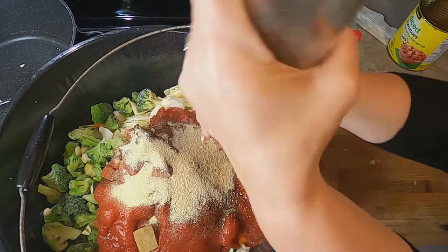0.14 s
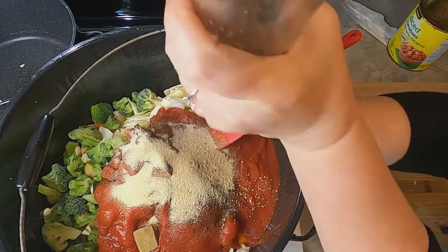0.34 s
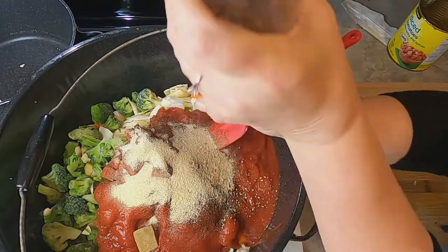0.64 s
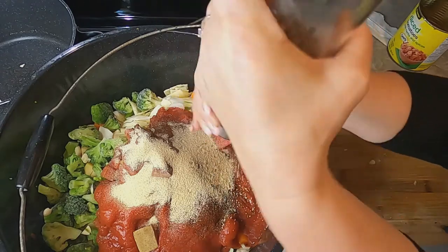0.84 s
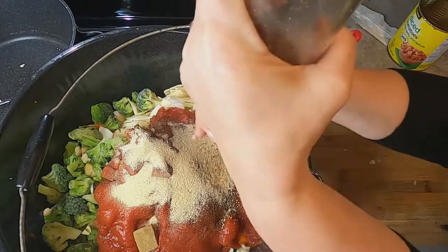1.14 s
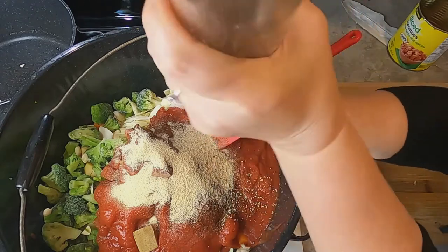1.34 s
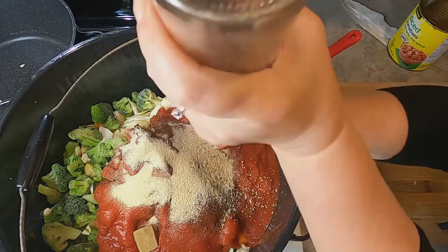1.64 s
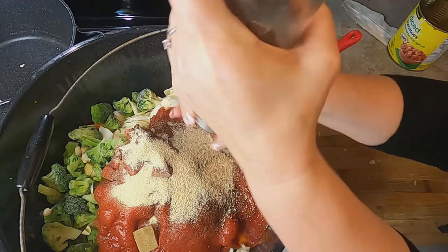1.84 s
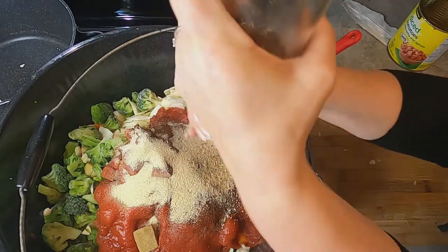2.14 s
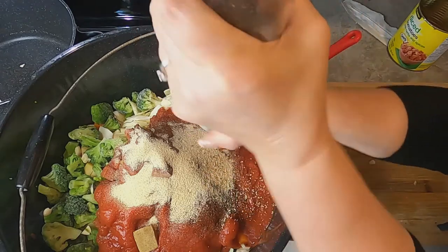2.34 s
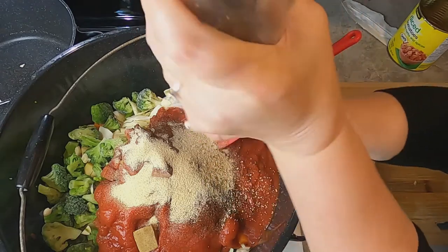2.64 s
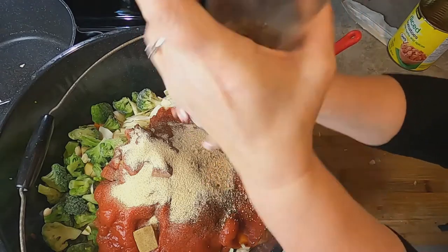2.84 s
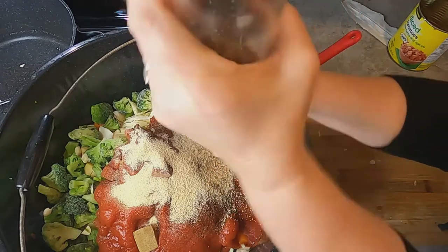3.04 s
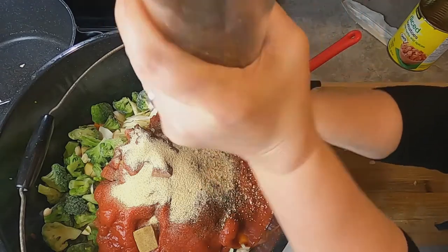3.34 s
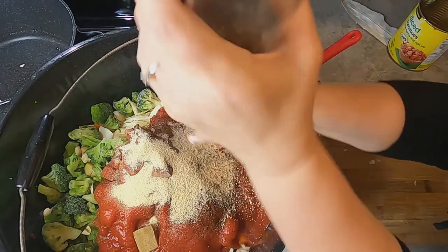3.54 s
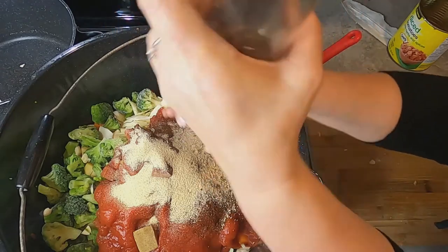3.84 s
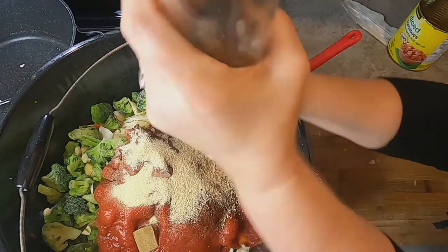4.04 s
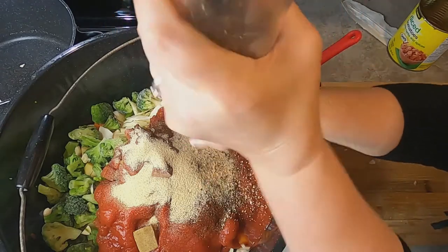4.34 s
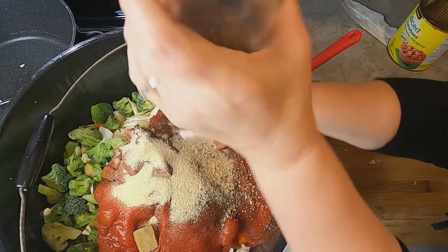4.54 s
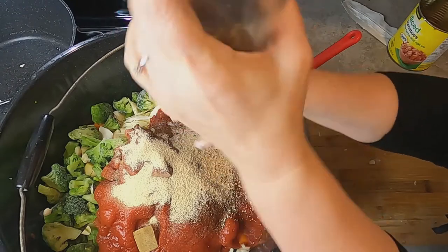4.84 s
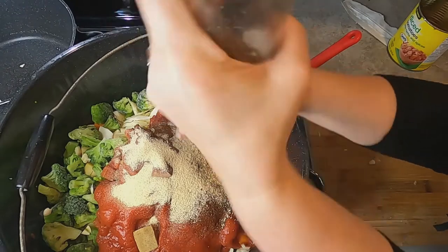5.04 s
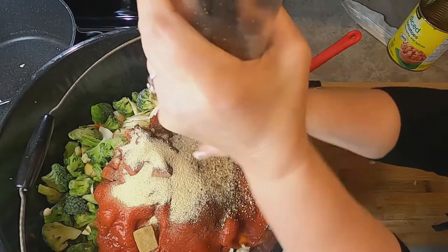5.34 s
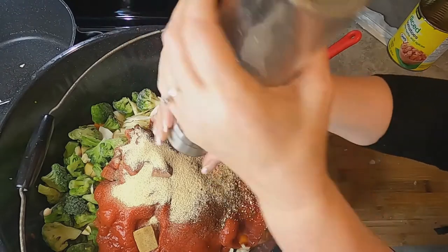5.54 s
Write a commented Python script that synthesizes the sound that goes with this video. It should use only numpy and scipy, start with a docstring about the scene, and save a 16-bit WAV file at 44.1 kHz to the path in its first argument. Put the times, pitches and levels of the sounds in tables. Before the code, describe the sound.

Peppercorns crack and crunch in a hand mill twisted quickly to and fro, with soft rubbing between strokes over faint kitchen rumble.

```python
"""A hand pepper mill twists to and fro, three strokes a second, over a pan in a faintly rumbling kitchen.
Each forward twist starts with a creak as the housing takes the load. The burrs bite: peppercorns
crack and crumble to grit, and every fracture rings the housing. On the swing back the mill
rubs softly and loose pieces tick, until the next twist bites."""
import sys
import numpy as np
from scipy import signal
from scipy.fft import rfft, irfft, next_fast_len
from scipy.io import wavfile
from scipy.ndimage import uniform_filter1d, map_coordinates

SR = 44100
rng = np.random.default_rng(int(sys.argv[2]) if len(sys.argv) > 2 else 0)


def generate_wav(sig):
    """Save sig (samples, or channels by samples) to the path in sys.argv[1] as 16-bit PCM at SR."""
    pcm = np.round(np.clip(np.atleast_2d(sig).T, -1, 1) * 32767).astype(np.int16)
    wavfile.write(sys.argv[1], SR, pcm)


N = 251017
TIME = np.arange(N) / SR
ENVELOPE_TIME = TIME[::32]
LEFT_RIGHT = np.array([[1], [-1]])


def from_db(db):
    """Decibels to gain."""
    return 10 ** (np.asarray(db) / 20)


def unit_rms(x):
    """Scale to unit rms."""
    return x / np.sqrt(np.mean(x ** 2) + 1e-20)


def at_hz(points, hz):
    """Interpolate a curve on a log-frequency axis."""
    points = np.array(points)
    return np.interp(np.log(hz + 1e-9), np.log(points[:, 0]), points[:, 1])


def butter(x, hz, kind, order=2):
    """Causal Butterworth filter."""
    return signal.sosfilt(signal.butter(order, hz, kind, fs=SR, output="sos"), x)


def drift(rate_hz):
    """Random wander, unit rms."""
    knots = rng.standard_normal(4000)
    return unit_rms(np.interp(TIME * rate_hz, np.arange(len(knots)), knots))


def plateau(start_s, end_s, rise_s, fall_s):
    """Exponential rise, hold from start to end, exponential fall."""
    t = ENVELOPE_TIME
    return np.exp(-np.maximum(start_s - t, 0) / rise_s - np.maximum(t - end_s, 0) / fall_s)


def impulses(per_s, spread_db):
    """Random clicks; a positive spread makes a few larger, a negative one a few smaller."""
    sizes = from_db(spread_db * np.minimum(rng.exponential(1, N), 4))
    return unit_rms(sizes * (rng.random(N) < per_s / SR))


def resonate(clicks, modes, apart_hz=12000):
    """Each click drives each mode with a random strength; higher modes differ more left to right."""
    out, drive = np.zeros((2, len(clicks))), np.full((2, len(clicks)), 1e-18)
    hits = np.flatnonzero(clicks)
    pool = min(len(clicks), 4099)
    for hz, width_hz, level_db, pan_db in modes:
        radius, angle = np.exp(-np.pi * width_hz / SR), 2 * np.pi * hz / SR
        mid, side = rng.standard_normal((2, pool))[:, hits % pool]
        apart = min(hz / apart_hz, 1)
        gain = from_db(level_db + pan_db * LEFT_RIGHT / 2) / np.hypot(1, apart)
        drive[:, hits] = gain * clicks[hits] * (mid + apart * side * LEFT_RIGHT)
        drive[:, ::64] += 1e-18   # denormal guard
        leak = np.exp(-angle / 2)   # a small body radiates poorly below each mode
        zeros = np.array([1, -1, -1, 1]) * (1 - radius ** 2) * (1 + leak) / 4
        poles = np.convolve([1, -2 * radius * np.cos(angle), radius ** 2], [1, -leak])
        out += signal.lfilter(zeros, poles, drive)
    return out


# Room noise spectrum: f/Hz, relative density/dB
AIR_SPECTRUM = [(20, 10), (42, 6), (65, -5), (100, -22.5), (160, 4), (220, -4), (320, -7.5), (550, -12.5),
                (1200, -12.5), (3000, -10), (7000, -11.5), (14000, -30.5)]


def room_air(level_db=-58.5, side_gain=0.89, heave_db=3.0):
    """Room hiss and a slowly heaving rumble."""
    size = next_fast_len(N)
    shape = from_db(at_hz(AIR_SPECTRUM, np.arange(size // 2 + 1) * SR / size))
    mid, side = irfft(rfft(rng.standard_normal((2, size))) * shape, size)[:, :N]
    side = side_gain * butter(side, 46, "high", order=1)
    noise = from_db(level_db) * unit_rms(mid + side * LEFT_RIGHT)
    rumble = butter(noise, 60, "low", order=1)
    return noise + rumble * (from_db(heave_db * drift(6.3)) - 1)


# Wall reverberation: f/Hz, T60/s
WALL_DECAY = [(200, 0.33), (1000, 0.38), (4000, 0.46), (14000, 0.26)]


def kitchen_echoes(x, tail_db=-12.0, near_db=-12.5, near_s=0.0035, side_gain=0.74, wide_hz=1110):
    """Quick reflections off hands, pan and hob, then the walls' short tail; narrow in the bass."""
    t = np.arange(SR // 2) / SR
    edges_hz = np.geomspace(100, 16000, 8)
    mid, side = rng.standard_normal((2, len(t)))
    side = side_gain * butter(side, wide_hz, "high", order=1)
    noise = (mid + side * LEFT_RIGHT) * (t > 0.002)
    tail = 0
    for low, high in zip(edges_hz, edges_hz[1:]):
        t60_s = at_hz(WALL_DECAY, np.sqrt(low * high))
        tail += butter(noise, [low, high], "band") * from_db(-60 * t / t60_s)
    near = noise * np.exp(-t / near_s)
    response = from_db(tail_db) * unit_rms(tail) + from_db(near_db) * unit_rms(near)
    return signal.fftconvolve(x, response / np.sqrt(len(t)), axes=1)[:, :N]


# Rubbing modes: f/Hz, width/Hz, level/dB, left-right/dB
WHISPER_MODES = [(1157, 70, -18, 2), (1760, 600, -14.5, 3), (2400, 130, -10, 3), (2646, 167, -2.5, 2),
                 (3120, 270, -18.5, 5), (5230, 400, -13.5, 0), (5860, 320, -6, 1.5), (7500, 170, -25, 20),
                 (9540, 120, -14.5, -3), (12080, 420, -28.5, -16.5)]
# Thin ring of the sliding burr: f/Hz, width/Hz, level/dB, left-right/dB
BURR_MODES = [(2694, 80, 0, 2.5)]


def rubbing(gain_db=-4.5, floor_db=-68, ring_db=-5, grip_db=4.0, flutter_db=3.0, waver=0.021):
    """Fine stick-slip on the swing back: a whisper and a thin ring, wavering with the grip."""
    ring_gain = from_db(ring_db + grip_db * np.tanh(drift(21)))
    ring = ring_gain * unit_rms(resonate(impulses(per_s=1800, spread_db=4.5), BURR_MODES))
    whisper = unit_rms(resonate(impulses(per_s=1800, spread_db=4.5), WHISPER_MODES))
    position = np.cumsum(1 + waver * drift(16))
    rub = np.array([map_coordinates(channel, [position], mode="mirror") for channel in whisper + ring])
    swings, start_s = 0, 0
    for bite_s, hold_s, *_, swing_db in TWISTS:
        # the hand rests before and after each twist
        swings += from_db(swing_db) * plateau(start_s, bite_s - 0.091, rise_s=0.03, fall_s=0.056)
        start_s = bite_s + hold_s + 0.06
    envelope = np.interp(TIME, ENVELOPE_TIME, swings) + from_db(floor_db)
    return envelope * from_db(gain_db + flutter_db * drift(60)) * rub


# Mill housing modes: f/Hz, width/Hz, level/dB, left-right/dB
HOUSING_MODES = [(225, 64, -25.5, -16), (450, 73, -13.5, 2.5), (584, 37, -9, 3.5), (805, 86, -5, -2.5),
                 (921, 82, -1.5, 6.5), (1047, 103, 3, -2.5), (1192, 68, 2.5, 7.5), (1343, 107, 2, 1),
                 (1544, 77, 1.5, 7.5), (1730, 246, -1.5, -2), (1933, 195, -6, 8), (2192, 20, -0.5, 9.5),
                 (2620, 128, 2, -3.5), (2755, 347, 1.5, 7.5), (3137, 86, 0, -3), (3580, 380, -4, 1.5),
                 (3996, 200, -4, 1.5), (4426, 310, -4.5, 3), (4980, 160, -4, -1), (5416, 520, -7, 0),
                 (6960, 430, -12, -1), (7550, 47, -10.5, 13), (8520, 140, -10, 0), (9220, 590, -15.5, -11),
                 (11900, 490, -46, -12), (13300, 440, -33, -15)]
# Low, mid and treble bands of a snap: lower f/Hz, upper f/Hz
SNAP_BANDS = [(100, 2200), (2200, 3400), (3400, 16000)]


def housing_snaps(events, splinters_per_s=8500, after_db=-27, after_s=0.0049, level_span_s=0.005):
    """Runs of splinters ring the housing. Events: t/s, three band levels/dB, decay/s."""
    out, length = np.zeros((2, N)), SR // 40
    t = np.arange(length) / SR
    for start_s, levels_db, decay_s in events:
        splinters = (rng.random(length) < splinters_per_s / SR) + 2.05 * (t == 0)
        envelope = np.exp(-(t / decay_s) ** 2 / 2) + from_db(after_db) * np.exp(-t / after_s)
        ring = resonate(splinters * envelope, HOUSING_MODES)
        start = round(start_s * SR)
        for band_hz, level_db in zip(SNAP_BANDS, levels_db):
            band = butter(ring, band_hz, "band", order=3)
            span_rms = np.sqrt(np.sum(band ** 2) / (2 * level_span_s * SR))
            out[:, start:start + length] += from_db(level_db) * band / span_rms
    return out


# Pieces dropping in the hopper: t/s, relative level/dB
HOPPER_DROPS = [(.636, -47), (0.703, -53), (1.3317, -51), (1.6894, -50.5), (2.0157, -48), (2.6624, -48.5),
                (3.3437, -47), (4.3463, -48.5), (4.6006, -45.5), (4.6757, -48.5), (4.93, -52),
                (5.0449, -47.5), (5.2734, -45), (5.3353, -44.5)]


def ticking(bands_db=(-7, -1, 3.5), decay_s=0.00064, crumbs_db=-66):
    """Loose corns drop in the hopper; crumbs shift with tiny bright ticks."""
    drops = housing_snaps([(t_s, db + np.array(bands_db), decay_s) for t_s, db in HOPPER_DROPS])
    crumbs = resonate(impulses(per_s=35, spread_db=-1.5), HOUSING_MODES)
    return drops + from_db(crumbs_db) * unit_rms(butter(crumbs, 4300, "high"))


# Lone creaks as the grip shifts: t/s, half length/s, level/dB
GRIP_CREAKS = [(0.486, 0.0073, -35), (.648, 0.0022, -35), (.978, .0034, -31), (3.037, .01, -43.5),
               (3.713, 0.0052, -39), (3.769, 0.01, -43.5), (5.059, 0.0032, -50), (5.323, 0.0063, -47)]
# Hollow housing modes: f/Hz, width/Hz, level/dB, left-right/dB
HOLLOW_MODES = [(1060, 59, 2, -1), (1220, 115, 0, 3), (1560, 280, -3, 1)]


def creaking(lead_s=0.022, load_half_s=0.0081, load_db=-13.5):
    """Short slips ring the hollow modes as each twist takes the load and when the grip shifts."""
    load_creaks = [(bite_s - lead_s, load_half_s, db + load_db) for bite_s, _, _, db, _, _ in TWISTS]
    swells = sum(from_db(db) * np.exp(-np.abs((ENVELOPE_TIME - t_s) / half_s) ** 3 / 2)
                 for t_s, half_s, db in load_creaks + GRIP_CREAKS)
    slips = resonate(impulses(per_s=900, spread_db=0), HOLLOW_MODES)
    return np.interp(TIME, ENVELOPE_TIME, swells) * unit_rms(slips)


# Forward twists, levels relative: bite t/s, hold/s, rise/s, level/dB, brightness/dB, prior swing/dB
TWISTS = [(.194, 0.04, 0.011, -33.5, 2.5, -46.5), (0.519, 0.029, 0.015, -31, -3.5, -50.5),
          (0.853, 0.04, .015, -26, -8.5, -53), (1.149, .069, .004, -30, -5.5, -49),
          (1.491, 0.07, 0.013, -29, -9.5, -55.5), (1.801, 0.081, 0.0085, -36, 1.5, -49),
          (2.129, .065, 0.013, -38, 2, -50), (2.48, 0.03, 0.019, -30, -3.5, -57.5),
          (2.796, .056, 0.017, -31.5, -5, -54.5), (3.129, 0.039, 0.013, -27.5, -3, -52),
          (3.474, 0.039, 0.015, -32, -3.5, -55), (3.799, 0.052, 0.013, -36, 0.5, -56),
          (4.145, 0.033, 0.024, -36.5, 0.5, -52), (4.456, 0.072, .007, -34.5, -5.5, -50.5),
          (4.81, 0.041, 0.029, -36.5, -3, -47.5), (5.128, 0.063, 0.019, -34.5, -2.5, -51),
          (5.458, 0.063, 0.022, -37, -4.5, -52)]
# Low knock of the whole mill: f/Hz, width/Hz, level/dB, left-right/dB
JOLT_MODES = [(160.3, 44, 1.5, 1.5), (212, 88, -8.5, 2)]


def grinding(grit_db=2.5, jolt_db=-26.5, lumps_db=2.1, release_s=0.024):
    """Grit crumbles between the burrs during each twist, ringing the housing and jolting the mill."""
    envelopes = 0
    for bite_s, hold_s, rise_s, level_db, bright_db, _ in TWISTS:
        gains = from_db([[level_db], [level_db + bright_db]])
        envelopes += gains * plateau(bite_s, bite_s + hold_s, rise_s, release_s)
    force, sharpness = (np.interp(TIME, ENVELOPE_TIME, envelope) for envelope in envelopes)
    fractures = impulses(per_s=1900, spread_db=2.5)
    # steady pressure evens out the work; corns passing the teeth make it lumpy
    local_rms = np.sqrt(uniform_filter1d(fractures ** 2, size=1300) + 0.042)
    fractures *= from_db(lumps_db * drift(140)) / local_rms
    ring = resonate(fractures, HOUSING_MODES)
    grit = unit_rms(butter(ring, 7500, "low", order=1))   # crumbs are softer than whole corns
    dull = butter(grit, 1550, "low", order=1)
    crunch = force * dull + sharpness * (grit - dull)
    jolt = force * unit_rms(resonate(fractures, JOLT_MODES))
    return from_db(grit_db) * crunch + from_db(jolt_db) * jolt


# Whole corns breaking: t/s, relative level/dB, brightness/dB, decay/s
CORN_BREAKS = [(.177, -30.5, -9, 0.0012), (0.1901, -35, -1, 0.0011), (0.4772, -35, -8, 0.0012),
               (0.5176, -29.5, -4, 0.0013), (0.8231, -33.5, -5.5, 0.0021), (0.8608, -22, 2.5, 0.0045),
               (.898, -28.5, -20, 0.00051), (1.148, -21, -4.5, 0.0025), (1.1715, -27, 2.5, .0018),
               (1.4897, -38, -14, .0017), (1.5088, -31, 0, 0.0026), (1.5527, -21.5, -4.5, 0.0013),
               (1.7972, -36, -4.5, 0.0021), (1.841, -21.5, -2.5, 0.0056), (1.8784, -34, 12.5, 0.0014),
               (2.1335, -27.5, 0.5, .0011), (2.1642, -30.5, -1, 0.0031), (2.1886, -33, 2, 0.0057),
               (2.4478, -41, -11.5, 0.0015), (2.4759, -28.5, -0.5, 0.0064), (2.804, -29.5, 6.5, .0035),
               (3.1191, -28, 1, 0.0016), (3.1436, -35, 6, 0.0025), (3.1586, -27, -10, 0.0015),
               (3.4767, -29, -1.5, 0.0017), (3.7883, -25.5, 1.5, 0.00037), (3.8589, -35.5, 1, 0.0021),
               (4.1072, -45.5, 0, 0.00079), (4.132, -37, -4, .003), (4.1451, -26.5, 1, 0.0017),
               (4.4592, -38, 8.5, 0.0002), (4.4852, -40, 10.5, 0.0005), (4.755, -42, -10, 0.0014),
               (4.8181, -43, 10.5, .0012), (4.8277, -41, 15.5, .003)]


def cracking(gain_db=2.5, bare_treble_db=3.0, cushion_db=12.5, gather_s=0.0084):
    """Corns break sharpest on the bare burrs at the bite, duller as grit gathers."""
    bites_s = np.array(TWISTS)[:, 0]
    events = []
    for t_s, level_db, bright_db, decay_s in CORN_BREAKS:
        since_bite_s = t_s - bites_s[np.argmin(np.abs(t_s - bites_s))]
        treble_db = bare_treble_db - cushion_db * np.clip(since_bite_s / gather_s, 0, 1)
        bands_db = np.array([0, bright_db, bright_db + treble_db])
        events.append((t_s, gain_db + level_db + bands_db, decay_s))
    return housing_snaps(events)


def scene(left_lag_samples=2.0):
    """The mill close by in the kitchen, reaching the left side a moment later."""
    mill = grinding() + cracking() + creaking() + rubbing() + ticking()
    allpass = (1 - left_lag_samples) / (1 + left_lag_samples)   # the treble lags less
    mill[0] = signal.lfilter([allpass, 1], [1, allpass], mill[0])
    return mill + kitchen_echoes(mill) + room_air()


def record(dry, cutoff_hz=14900):
    """Steep elliptic low-pass."""
    return signal.sosfilt(signal.ellip(10, 0.3, 90, cutoff_hz, fs=SR, output="sos"), dry)


dry = scene()
out = record(dry)
generate_wav(out)
```